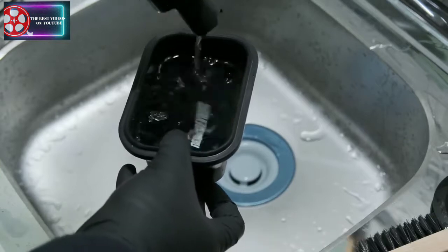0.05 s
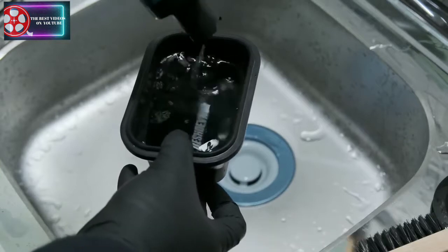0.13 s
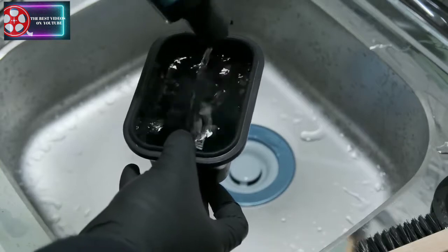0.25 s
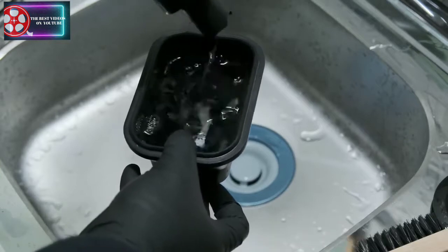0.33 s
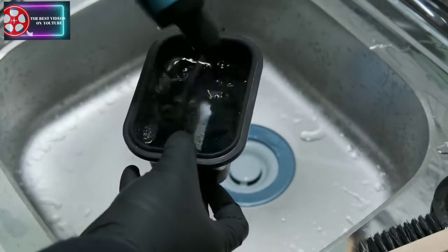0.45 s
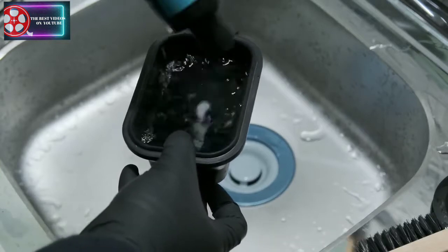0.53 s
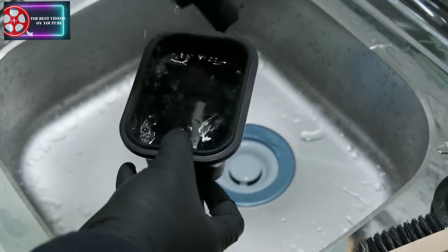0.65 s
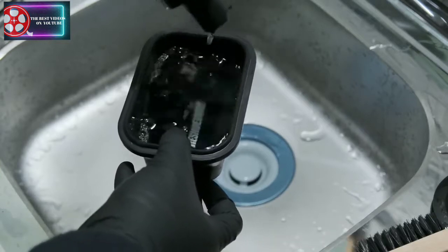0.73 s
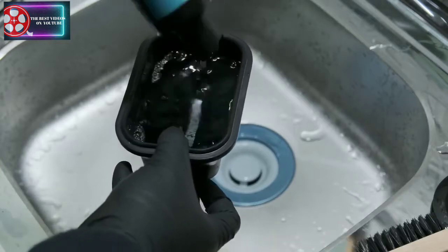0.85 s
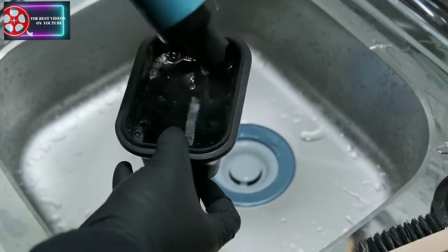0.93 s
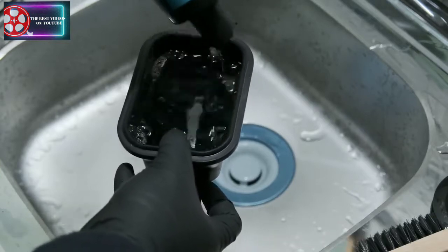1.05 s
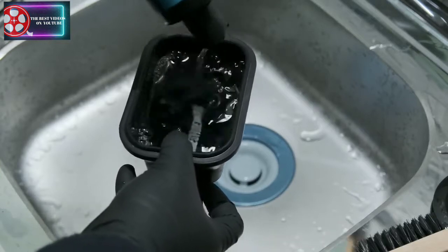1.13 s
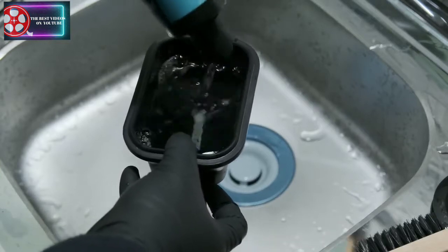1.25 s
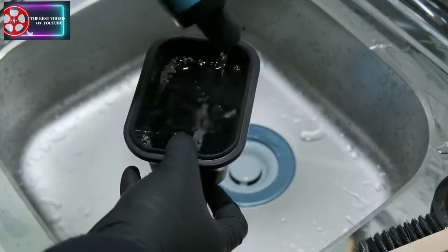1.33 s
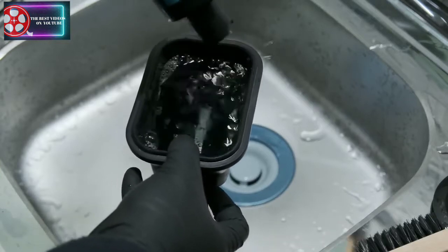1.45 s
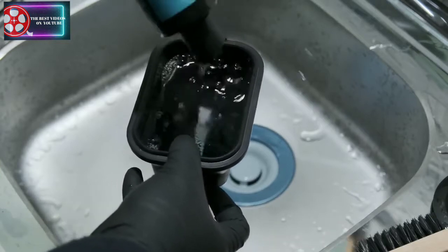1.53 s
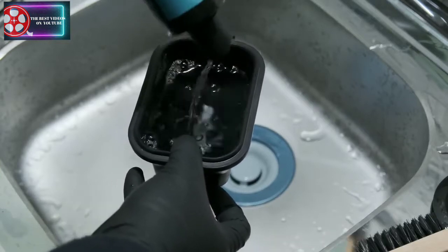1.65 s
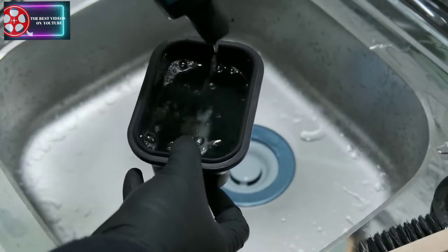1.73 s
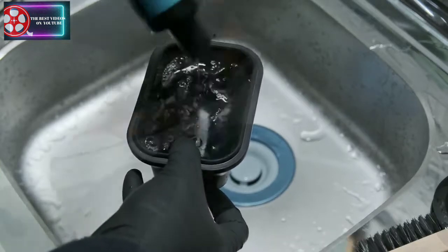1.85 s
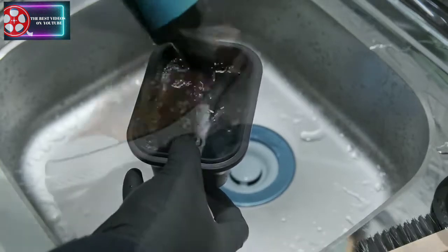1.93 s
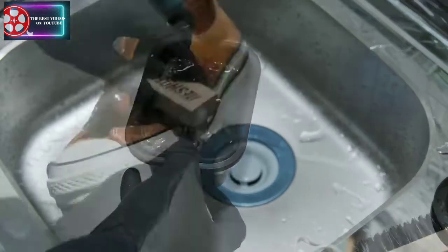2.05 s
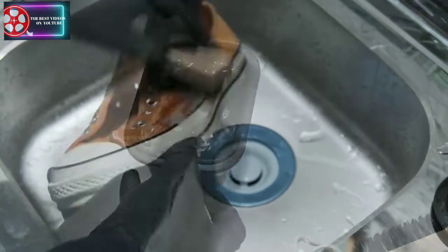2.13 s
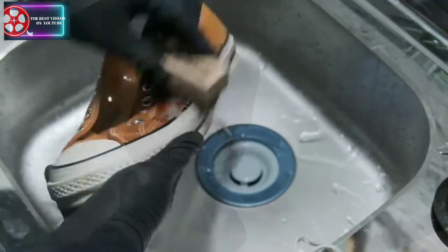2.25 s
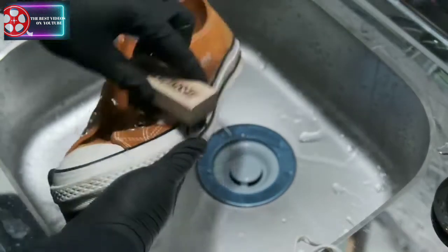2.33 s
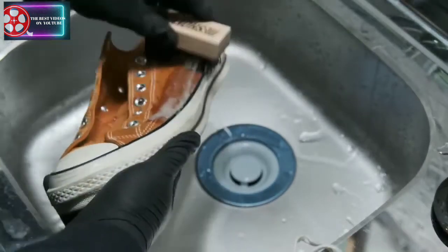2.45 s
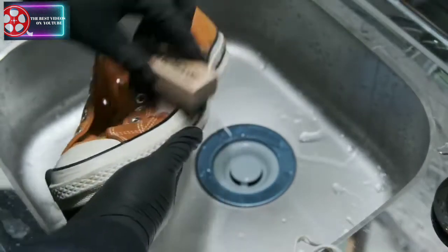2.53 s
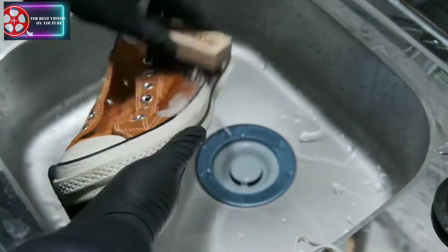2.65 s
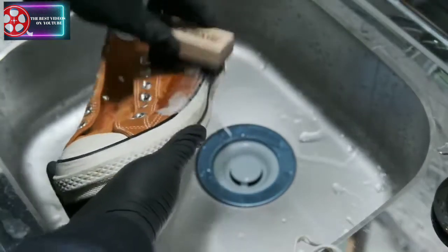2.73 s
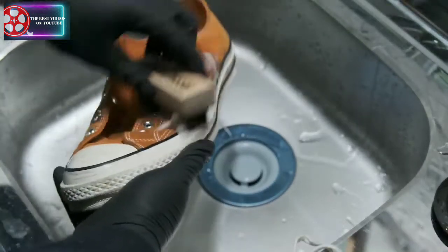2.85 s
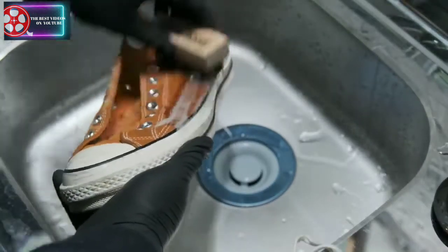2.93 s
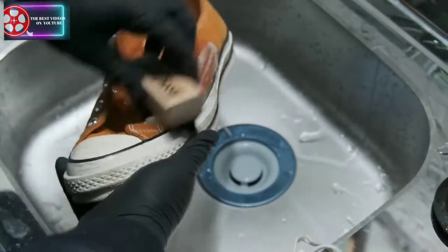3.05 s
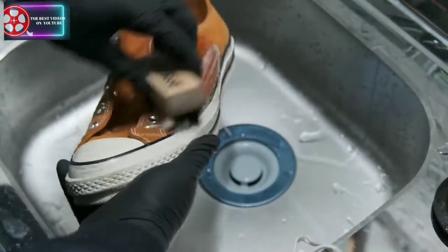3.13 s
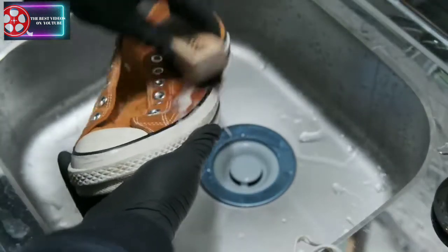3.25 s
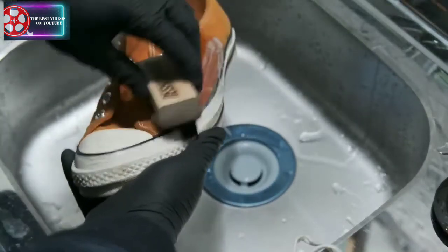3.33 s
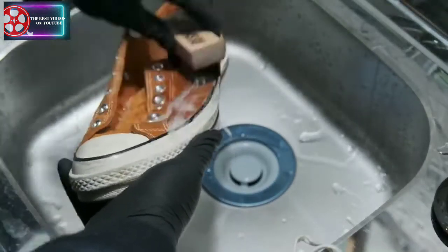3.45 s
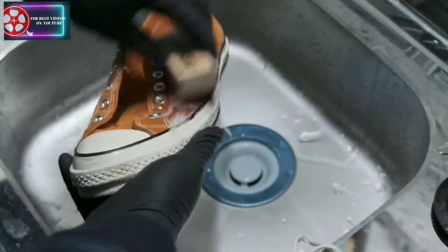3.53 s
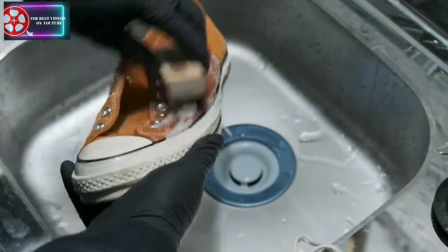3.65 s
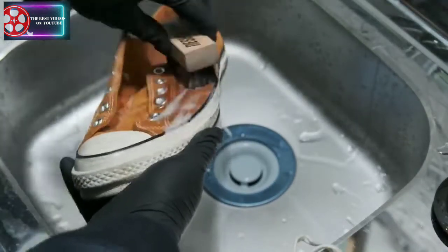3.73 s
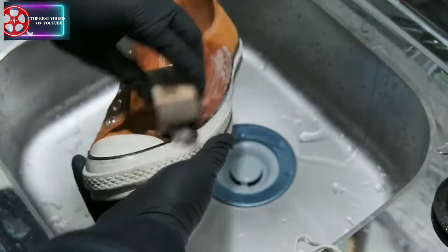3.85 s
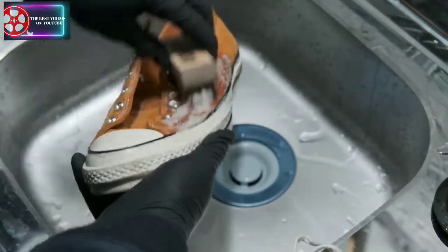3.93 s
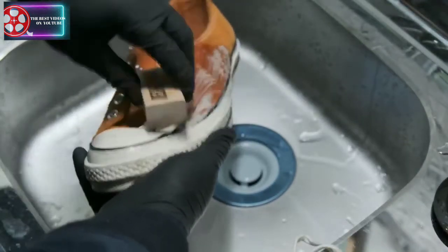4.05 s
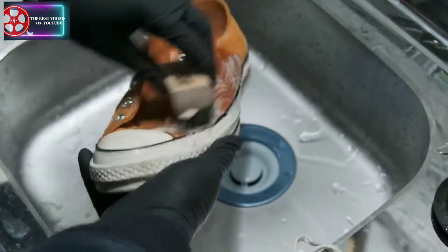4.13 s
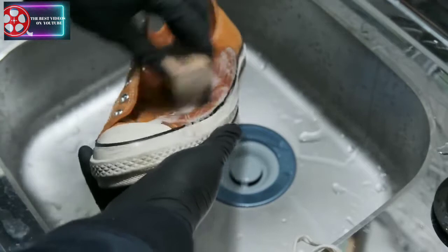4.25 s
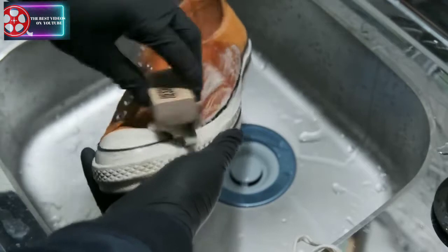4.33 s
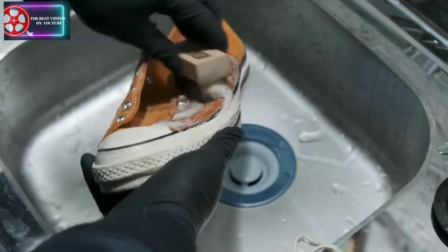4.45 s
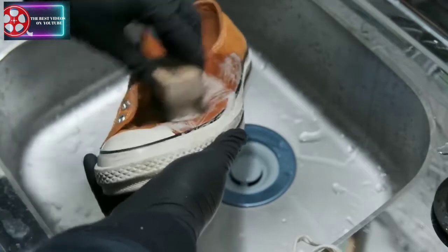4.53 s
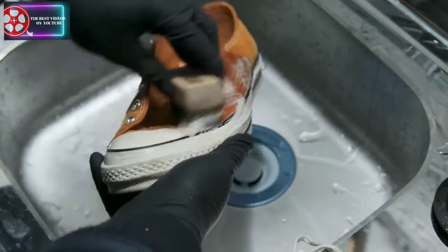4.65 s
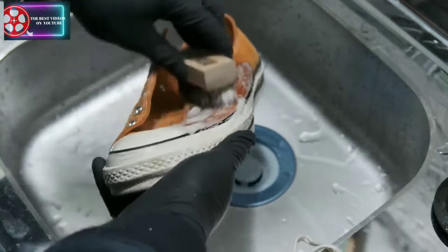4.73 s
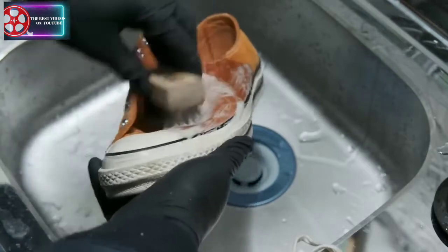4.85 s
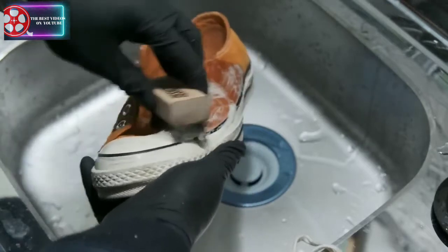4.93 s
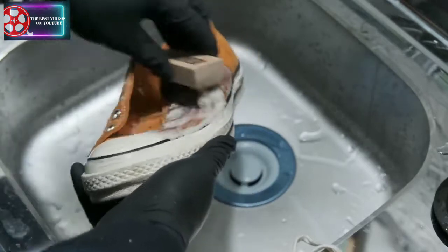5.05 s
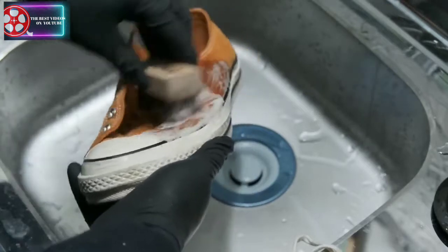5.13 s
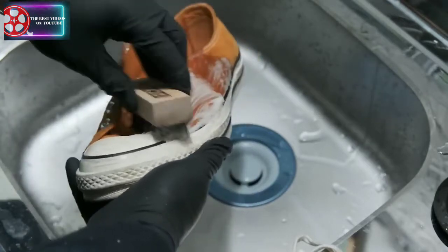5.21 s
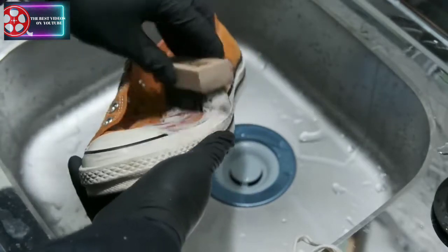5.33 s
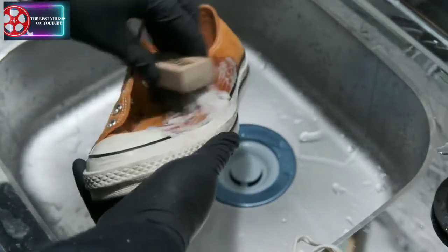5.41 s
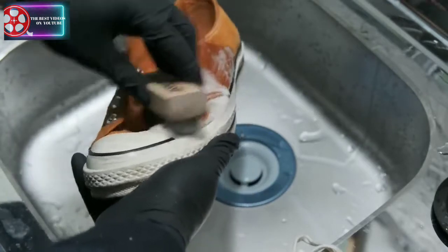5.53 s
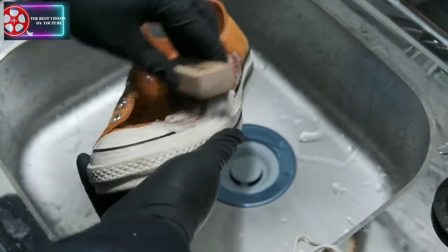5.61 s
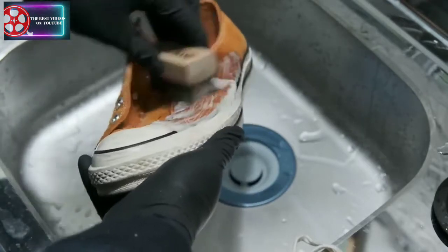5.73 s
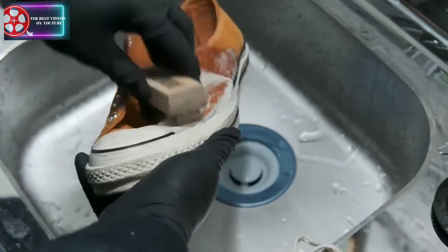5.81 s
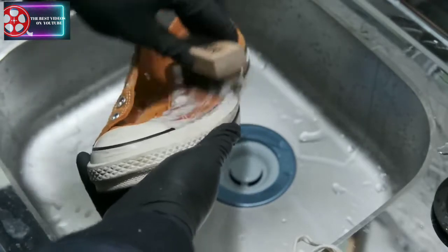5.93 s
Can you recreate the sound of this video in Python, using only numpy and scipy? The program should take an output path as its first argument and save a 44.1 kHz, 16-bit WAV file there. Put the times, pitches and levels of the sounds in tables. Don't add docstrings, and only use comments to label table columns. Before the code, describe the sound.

Water drips and bubbles ring in a small tub over a steel sink, then a stiff brush scrubs a wet shoe in quick rhythmic strokes.

```python
import sys
import numpy as np
from scipy import signal
from scipy.fft import rfft, irfft
from scipy.io import wavfile
from scipy.ndimage import uniform_filter1d

SR = 44100
rng = np.random.default_rng(int(sys.argv[2]) if len(sys.argv) > 2 else 0)


def master(y):
    cut = np.clip(np.atleast_2d(y).T, -1, 1)
    pcm = np.round(cut * 32767)
    wavfile.write(sys.argv[1], SR, pcm.astype(np.int16))


def invert_db(x):
    u = np.asarray(x, float) / 20
    return 10 ** u


N = 263718
T = np.arange(N) / SR
HZ = np.maximum(np.fft.rfftfreq(N, 1 / SR), 1.)

# f/Hz, density/dB
HISS_COLOUR = [(15, -38), (25, -18), (130, -13), (353, -7), (751, -6.5), (1190, -6.5), (1480, -8.5),
               (2210, -6), (3800, -9), (6880, -10.5), (10600, -12), (15900, -12)]
HISS_DB = -59.5
# multiple of the hum, level/dB
MOTOR = [(1, -94), (2, -88), (3, -85.5), (5, -82.5), (6, -85), (8, -86)]
MOTOR_HZ = 66

# t/s, level/dB, start f/Hz, end f/Hz, length/s, lateness of the rise
GURGLES = [
    (0.177, -38, 1306, 1485, 0.048, 1.86),
    (0.223, -48.5, 1440, 3020, 0.023, 2),
    (0.356, -39, 1428, 4630, .021, 2.27),
    (0.657, -60, 4300, 5600, 0.021, 1.5),
]
# t/s, length/s, level/dB, lowest f/Hz, highest f/Hz
FROTH = [(0., 0.04, -59.5, 730, 3300), (0.157, 0.026, -46, 3050, 6000), (0.222, 0.039, -51, 960, 6000),
         (0.376, 0.037, -47.5, 2030, 6170), (0.563, 0.082, -54, 790, 2300), (0.557, 0.035, -40, 3000, 5400),
         (0.601, 0.076, -55, 890, 5260), (0.882, 0.12, -68, 510, 1590), (1.097, 0.039, -57, 2970, 4460),
         (1.477, 0.097, -60, 500, 2330), (1.48, 0.061, -57, 3050, 5160), (1.607, 0.019, -57, 3100, 5030),
         (1.697, 0.096, -56, 2080, 5660), (1.741, 0.11, -64, 386, 2850), (1.747, .07, -62, 348, 700),
         (1.73, 0.056, -58, 5500, 10000), (1.911, 0.074, -53.5, 3080, 9850),
         (2.044, 0.036, -62.5, 473, 1830), (1.276, 0.021, -52, 3900, 5200), (1.287, .04, -56, 1900, 2600),
         (1.31, 0.022, -50, 5800, 8200), (1.426, .04, -55, 5200, 9000), (2.049, 0.012, -50, 3800, 4800),
         (.08, 0.042, -57, 5430, 7500)]
# t/s, peak level/dB, f/Hz
DROPLETS = [(0.575, -24, 1940), (0.585, -35, 1300), (0.597, -36, 2070), (0.61, -41, 1900),
            (0.624, -46, 1400), (1.299, -40, 2320), (1.32, -49, 1900), (1.515, -35, 1390),
            (1.526, -42, 1370), (1.537, -43, 1460), (1.564, -50, 1410), (1.703, -47, 3840),
            (1.714, -38, 4270), (1.741, -42, 1730), (1.757, -46, 1300), (1.775, -40, 1330),
            (1.837, -47, 1770), (1.884, -50, 5030), (1.937, -34, 4430), (1.954, -47, 4530)]
DROPLET_CYCLES = 3.9
# t/s, peak level/dB
SPRAY = [(0.2228, -37), (0.376, -35), (0.3925, -39), (0.417, -27), (0.557, -39), (0.5949, -34),
         (1.0679, -36), (1.1148, -46), (1.2495, -34), (1.276, -26.5), (1.3087, -24), (1.424, -24),
         (1.493, -30), (1.7614, -41), (1.798, -36), (1.8446, -36), (1.903, -36)]
# t/s, peak level/dB, f/Hz, ring t60/ms
BUBBLES = [(0.1, -43, 875, 32), (0.0983, -43, 1256, 34), (0.1788, -24, 1340, 8.6), (0.198, -31, 2500, 11),
           (0.225, -28, 3760, 10.7), (0.2243, -34, 2110, 21), (0.418, -33, 1290, 25),
           (0.418, -31.5, 2580, 18), (0.5567, -29, 1970, 22), (0.819, -43.5, 1130, 18),
           (0.8826, -44, 900, 20), (1.0126, -47, 3330, 24), (1.0914, -42.5, 2770, 19),
           (1.239, -36.5, 2140, 18), (0.377, -21, 4660, 8.2), (1.2772, -32, 4330, 11),
           (1.2888, -48, 2210, 29), (1.4703, -17.5, 1404, 24), (1.4939, -39, 3720, 9),
           (1.7305, -46, 4360, 24), (1.7412, -37, 7000, 8), (1.7504, -45.5, 570, 25),
           (1.791, -39.5, 1285, 22), (1.791, -45, 2510, 22), (1.8005, -33.5, 4450, 17),
           (1.8157, -35, 1740, 21), (1.8284, -32.5, 2240, 6.9), (1.9303, -37, 3240, 11),
           (1.9683, -42, 4770, 16), (2.0532, -34.5, 4260, 20)]
# t/s, peak level/dB, f/Hz
POPS = [(0.013, -44, 2560), (0.099, -43, 6600), (0.164, -23, 3320), (0.2066, -37, 3960), (0.5572, -32, 910),
        (1.2404, -40, 4530), (0.4181, -30, 9900), (0.5573, -22.5, 1230), (0.5582, -14, 3900),
        (0.5637, -23, 4730), (0.597, -35, 10800), (0.646, -41, 1290), (0.6782, -35, 7160),
        (1.07, -41, 11200), (1.2508, -39, 12130), (1.3105, -23, 6760), (1.4284, -24.5, 10900),
        (1.429, -19, 6860), (1.4708, -33, 2530), (1.4877, -31, 1720), (1.505, -34, 4190),
        (1.6097, -41, 4180), (1.6437, -41.5, 2270), (1.747, -30, 8500), (1.8463, -32.5, 11500),
        (1.9042, -25, 9500), (1.909, -34, 5000), (1.9306, -23.5, 4530), (1.945, -31.5, 9050),
        (2.0536, -42, 1340), (0.679, -44, 1470), (0.694, -53, 810), (2.0565, -41, 9000), (1.538, -43, 3800)]
POP_CYCLES, POP_LEAST_MS = 20.3, 3.9
# t/s, crack level/dB
IMPACTS = [(0.099, -35.5), (0.164, -42), (0.1794, -31.5), (0.225, -34), (0.378, -26), (0.3938, -40),
           (0.4181, -30), (0.5583, -25.5), (0.5653, -41), (0.595, -37), (0.646, -45), (0.678, -33.5),
           (1.07, -51), (1.276, -34), (1.3101, -38), (1.426, -36), (1.4556, -51), (1.4938, -33),
           (1.741, -39), (1.747, -45), (1.7566, -34), (1.8003, -33.5), (1.929, -32), (1.9687, -40)]

# grip t/s, let-go t/s, early level/dB, late level/dB
STROKES = [(2.183, 2.247, -28, -25.5), (2.305, 2.37, -26.5, -26.5), (2.443, 2.509, -28.5, -28.5),
           (2.557, 2.628, -27, -27.5), (2.7, 2.757, -25, -24.5), (2.813, 2.883, -29, -28.5),
           (2.952, 3.018, -26.5, -25.5), (3.076, 3.149, -25.5, -26), (3.22, 3.275, -26, -24.5),
           (3.333, 3.394, -28.5, -23.5), (3.473, 3.53, -26.5, -24.5), (3.594, 3.657, -27, -25),
           (3.725, 3.79, -24.5, -26.5), (3.84, 3.898, -27, -24), (3.973, 4.037, -26, -27),
           (4.083, 4.133, -27, -25), (4.206, 4.28, -27.5, -27.5), (4.326, 4.392, -32, -27),
           (4.458, 4.524, -22, -25), (4.582, 4.656, -31, -32.5), (4.741, 4.848, -24, -30.5),
           (4.922, 5.003, -41.5, -38.5), (5.043, 5.143, -28, -30), (5.181, 5.272, -35.5, -34.5),
           (5.318, 5.46, -29.5, -29.5), (5.467, 5.547, -34.5, -31), (5.641, 5.758, -26.5, -27.5),
           (5.797, 5.87, -33, -30), (5.945, 5.982, -26.5, -25.5)]
USUAL_DB = -27
# t/s, level/dB
TURNS = [(2.165, -48), (2.285, -41.5), (2.416, -47), (2.537, -43.5), (2.673, -46), (2.795, -45.5),
         (2.928, -51), (3.052, -45), (3.193, -48), (3.313, -45.5), (3.449, -47.5), (3.567, -43.5),
         (3.703, -48), (3.819, -46.5), (3.949, -44.5), (4.064, -47), (4.177, -39.5), (4.31, -44.5),
         (4.429, -37), (4.562, -41.5), (4.692, -44.5), (4.899, -46), (5.011, -43), (5.166, -41),
         (5.292, -40.5), (5.468, -32), (5.586, -41), (5.791, -36), (5.907, -40)]
# t/s, lather/0-1, over the hollow/0-1
TRAVEL = [
    (2.15, 0.03, 0.2),
    (2.6, 0.33, 0.18),
    (3.3, 0.1, 0.33),
    (4.0, 0.05, 0.72),
    (4.3, 0.32, 0.6),
    (4.9, 0.82, 0.98),
    (5.4, 1, 0.93),
    (5.98, 0.72, 0.76),
]
# f/Hz, density/dB
SUEDE = [(260, -65), (450, -21), (590, -16), (760, -16), (900, -11.5), (1480, -6), (2000, -4.5),
         (3300, -4.5), (5000, -5.5), (6800, -9), (9500, -10.5), (12000, -13), (14000, -16.5), (15900, -23)]
# f/Hz, width/Hz, boost/dB
SHOE_MODES = [(630, 70, 3), (1005, 40, 5.5), (1320, 70, 2.5), (1790, 35, 3), (1915, 50, 3), (2520, 40, 2.5),
              (830, 60, 2.5), (2140, 70, 2.5), (2660, 300, 5), (3760, 110, 2.5), (4500, 200, 2)]
BRISTLE_DB, BRISTLE_FOLLOW, BRISTLE_PULL_DB, BRISTLE_LATHER_DB = -32, 0.48, -1, -7
BRISTLE_TURN_DB, BRISTLE_TURN_FOLLOW = -54, 0.79
LATHER_MUFFLES = .42
HOLLOW_DB, HOLLOW_FOLLOW, HOLLOW_TOE_DB, HOLLOW_PULL_DB = -46, 0.42, 4.5, 1.5
HOLLOW_TURN_DB, HOLLOW_TURN_TOE_DB, HOLLOW_TURN_FOLLOW = -57.5, 6, 0.83
THUD_DB, THUD_TOE_DB, THUD_UNEVEN_DB = -80.5, 15.5, 2.5
PUSH_BITE_DB = 0.5
TOE_TILT_DB = 4
# t/s, level/dB
KNOCKS = [(2.27, -68), (2.53, -66), (3.16, -63), (3.82, -72), (3.93, -61), (4.14, -55), (4.38, -54.5),
          (4.66, -55), (5.25, -63), (5.37, -61), (5.52, -58.5), (5.63, -57)]
KNOCK_S = 0.021
# t/s, level/dB
FIZZ = [
    (4.365, -44),
    (4.429, -40.5),
    (4.899, -48),
    (5.011, -58),
    (5.292, -45),
]
FIZZ_S = 0.02
# t/s, level/dB
RINGS = [
    (2.6, -67),
    (3.1, -63),
    (3.5, -44),
    (3.85, -50),
    (4.02, -49),
    (4.27, -50),
    (4.6, -44),
    (5.18, -57),
    (5.76, -47),
    (5.83, -51),
]
RING_HZ, RING_S = 999, 0.029
# t/s, level/dB
BOOMS = [
    (4.12, -50),
    (4.4, -51),
    (4.7, -46),
    (4.95, -50.5),
    (5.3, -55),
    (5.58, -45),
    (5.9, -47.5),
]
BOOM_HZ, BOOM_S = 624, 0.051
# t/s, peak level/dB, f/Hz, t60/ms
RAPS = [
    (2.603, -19, 3200, 9),
    (4.433, -24, 9000, 5.4),
    (4.916, -22, 1770, 60),
    (4.935, -25, 1490, 80),
    (4.966, -23.5, 2480, 31),
    (5.021, -18.5, 6000, 9.2),
    (5.939, -11, 8000, 4.4),
]

# from/s, to/s
DROPOUT = (1.859, 1.8675)
# t/s, length/s
GAPS = [(1.283, .004), (1.303, .003), (1.417, .006), (1.8135, .007), (1.8365, .006), (1.907, .0055)]
SPLIT_S = [2.47, 2.775, 3.68, 4.06, 4.165, 4.57, 5.0, 5.045, 5.16, 5.6, 5.93]
# f/Hz, level/dB
STARVED = [(40, -53), (260, -50.5), (450, -47), (600, -56), (11000, -59), (12500, -48.5), (14300, -42),
           (16000, -40.5)]
STARVE_FOLLOW = .25
FRAME_LEAD = 575
# from/s, to/s, up to f/Hz
BASS_HOLES = [(2.185, 2.245, 500), (2.42, 2.5, 470), (2.535, 2.64, 210), (2.56, 2.615, 470),
              (2.72, 2.78, 500), (2.78, 2.81, 120), (2.835, 2.85, 400), (2.95, 3.01, 470),
              (3.045, 3.105, 400), (3.19, 3.335, 210), (3.23, 3.29, 400), (3.465, 3.66, 450),
              (3.72, 3.8, 430), (3.835, 4.03, 230), (3.855, 3.875, 430), (3.995, 4.03, 450),
              (4.3, 4.335, 260), (4.58, 4.615, 210), (4.7, 4.78, 120), (4.76, 4.78, 470)]
# from/s, to/s
NOTCHES = [(2.3, 2.36), (3.34, 3.4), (3.78, 4.0), (4.08, 4.11), (4.45, 4.52), (5.69, 5.72)]
NOTCH_LO_HZ, NOTCH_HI_HZ = 335, 465


def gain_of_points(points):
    hz, db = np.transpose(points)
    return invert_db(np.interp(np.log(HZ), np.log(hz), db))


def above(hz, steep):
    return 1 / (1 + (hz / HZ) ** steep)


def filtered(x, gain):
    return irfft(rfft(x) * gain, N)


def shaped(x, gain, lo_hz=20, hi_hz=16000):
    z = rfft(x) * gain
    inside = (HZ > lo_hz) & (HZ < hi_hz)
    return irfft(z, N) * N / np.sqrt(2 * np.sum(np.abs(z[inside]) ** 2))


def walk(rate):
    k = int(SR / rate)
    held = np.repeat(rng.standard_normal(N // k + 1), k)
    return 1.38 * uniform_filter1d(uniform_filter1d(held, k), k)[:N]


def add(out, s, sound):
    i = int(s * SR)
    out[i:i + len(sound)] += sound


def bumps(events, width_s):
    return sum(invert_db(db) * np.exp(-((T - s) / width_s) ** 2) for s, db in events)


def eased(s, values):
    place = np.interp(T, np.sort(s), np.arange(len(s)))
    k = np.minimum(place.astype(int), len(s) - 2)
    u = place - k
    ramp = u * u * (3 - 2 * u)
    return uniform_filter1d(values[k] + (values[k + 1] - values[k]) * ramp, size=130)


def floor(side_db=-2.0):
    colour = gain_of_points(HISS_COLOUR)
    mid = shaped(rng.standard_normal(N), colour)
    side_tilt = 1 + 7.6 * above(8300, 0.89) + 0.48 * (1 - above(470, 2))
    side = shaped(rng.standard_normal(N), colour * side_tilt)
    hum = sum(invert_db(db) * np.sqrt(2) * np.sin(k * (2 * np.pi * MOTOR_HZ * T + k)) for k, db in MOTOR)
    return hum + invert_db(HISS_DB) * (mid + invert_db(side_db) * side * np.array([[1], [-1]]))


def basin(x, t60, wet_db, treble_t60):
    t = np.arange(int(.3 * SR)) / SR
    noise = rng.standard_normal((2, len(t)))
    dull = signal.lfilter([.4], [1, -.6], noise[0]) * invert_db(-60 * t / t60)
    bright = 0.32 * noise[1] * invert_db(-60 * t / treble_t60)
    tail = (dull + bright) * (t > .002)
    return x + invert_db(wet_db) * signal.fftconvolve(x, tail / np.sqrt(np.sum(tail ** 2)))[:N]


def froth(per_s, cycles):
    out, t = np.zeros(N), np.arange(1500) / SR
    for s, length, db, lo_hz, hi_hz in FROTH:
        chance = rng.random((120, 3))[:int(per_s * length)]
        for when, size, power in chance:
            hz = lo_hz * (hi_hz / lo_hz) ** size
            fade = np.minimum(t * hz, 1) * np.exp(-t * hz / cycles)
            ring = fade * np.sin(2 * np.pi * hz * t * (1 + 0.0059 * hz * t))
            add(out, s + when * length, invert_db(db - 7 * when + 10 * power) * ring)
    return out


def gurgles():
    out = np.zeros(N)
    for s, db, hz0, hz1, length, late in GURGLES:
        u = np.arange(int(length * SR)) / (length * SR)
        swell = np.sin(np.pi * u) ** .3 * invert_db(3.2 * walk(300)[:len(u)] - 130 * length * u)
        hz = hz0 * (hz1 / hz0) ** (u ** late)
        add(out, s, invert_db(db) * swell * np.sin(2 * np.pi * np.cumsum(hz) / SR))
    return out


def droplets_and_spray():
    out, t = np.zeros(N), np.arange(3000) / SR
    for s, db, hz in DROPLETS:
        fade = np.minimum(t * hz, 1) * np.exp(-t * hz / DROPLET_CYCLES)
        add(out, s, invert_db(db - 4.5) * fade * np.sin(2 * np.pi * hz * t))
    treble = signal.butter(4, 8500, "high", fs=SR, output="sos")
    tick = signal.sosfilt(treble, 1. * (t[:60] == 0))
    for s, db in SPRAY:
        add(out, s + .0012, invert_db(db + 2.5) * tick / tick.max())
    return out


def drips(rise=0.006, ring=0.82, ring_db=4.0, tick_ms=0.93, wobble_db=3.5):
    out, t = np.zeros(N), np.arange(3000) / SR
    for s, db, hz, ms in BUBBLES + [(*pop, POP_LEAST_MS) for pop in POPS]:
        t60 = max(ms, 1000 * POP_CYCLES / hz) * ring / 1000
        fade = np.exp(-np.log(1000) * t / t60)
        phase = 2 * np.pi * np.cumsum(hz * (1 + rise * (.5 - fade))) / SR
        wobble = wobble_db * np.repeat(rng.standard_normal(30), 100) * (t > .002)
        onset = np.minimum(t * hz / 1.63, 1)
        add(out, s, invert_db(db + ring_db + wobble) * fade * np.sin(phase) * onset)
    for s, db in IMPACTS:
        crack = signal.lfilter(*signal.iirpeak(6000, .55, fs=SR), rng.standard_normal(200))
        add(out, s, invert_db(db) * crack * np.exp(-t[:200] * 1000 / tick_ms))
    return out


def raps():
    out, t = np.zeros(N), np.arange(1700) / SR
    for s, db, hz, ms in RAPS:
        crack = signal.lfilter(*signal.iirpeak(hz, .7, fs=SR), rng.standard_normal(len(t)))
        add(out, s, invert_db(db - 60000 * t / ms) * crack / crack.std() / 2)
    return out


def thud_level():
    when, _, toe = np.transpose(TRAVEL)
    rumble = invert_db(THUD_DB + THUD_TOE_DB * np.interp(T, when, toe) + THUD_UNEVEN_DB * walk(7))
    return rumble + bumps(KNOCKS, KNOCK_S)


def stroke_levels(edge_db=-4, crown_db=0.5, lead=0.16, bite_s=.008, drag=.33):
    grip, free, early, late = np.transpose(STROKES)
    turn, turn_db = np.transpose(TURNS)
    when, lather, toe = np.transpose(TRAVEL)
    lather, toe = np.interp(grip, when, lather), np.interp(grip, when, toe)
    pull = np.arange(len(grip)) % 2
    middle = (early + late) / 2
    strength = middle - USUAL_DB
    span = lead * (free - grip)
    bite = grip - np.minimum(bite_s, 0.27 * (grip - turn))
    s = np.ravel([turn, bite, grip, grip + span, free - span, free], "F")
    grip_db = early + edge_db + PUSH_BITE_DB * (1 - 2 * pull)
    shape = np.array([grip_db, early + crown_db, late + crown_db, late + edge_db]) - middle
    turn_change = turn_db - turn_db[0]

    rasp = USUAL_DB + strength + shape
    hiss = BRISTLE_DB + BRISTLE_FOLLOW * strength + BRISTLE_PULL_DB * pull + BRISTLE_LATHER_DB * lather
    hiss_turn = BRISTLE_TURN_DB - 3.3 * lather + BRISTLE_TURN_FOLLOW * turn_change
    hollow = HOLLOW_DB + HOLLOW_FOLLOW * strength + (HOLLOW_TOE_DB + HOLLOW_PULL_DB * pull) * toe
    hollow_turn = HOLLOW_TURN_DB + HOLLOW_TURN_TOE_DB * toe + HOLLOW_TURN_FOLLOW * turn_change
    hollow_shape = shape + [[3.5], [0], [0], [5.5]]

    share = np.clip(drag + 0.54 * toe, 0, 1)
    levels = []
    for at_turn, stroke in [(turn_db, rasp), (hiss_turn, hiss + shape), (hollow_turn, hollow + hollow_shape)]:
        at_bite = at_turn + share * (stroke[0] - at_turn)
        levels.append(eased(s, np.ravel([at_turn, at_bite, *stroke], "F")))
    return levels


def flicks(per_s, spread_db, share):
    strength = invert_db(spread_db * np.minimum(rng.exponential(size=N), 2))
    let_go = (rng.random(N) < per_s / SR) * rng.standard_normal(N) * strength
    return share * let_go / let_go.std() + rng.standard_normal(N)


def suede_rasp(rub, toe):
    rasp, rubbed = 0, rfft(rub)
    edges_hz = [20, 1800, 2300, 2900, 3600, 4500, 20000]
    for lo_hz, hi_hz in zip(edges_hz[:-1], edges_hz[1:]):
        tilt_db = TOE_TILT_DB * (toe - .5) * np.log2(3200 / min(hi_hz, 5000))
        tuft = irfft(rubbed * (above(lo_hz, 16) - above(hi_hz, 16)), N)
        rasp = rasp + invert_db(tilt_db + 1.9 * walk(60) + 1.2 * walk(18)) * tuft
    return rasp


def brush():
    rasp_db, hiss_db, hollow_db = stroke_levels()
    when, lather, toe = np.transpose(TRAVEL)
    lather, toe = np.interp(T, when, lather), np.interp(T, when, toe)
    body = gain_of_points(SUEDE)
    for hz, width_hz, db in SHOE_MODES:
        body = body * invert_db(db / (1 + (2 * (HZ - hz) / width_hz) ** 2))
    low, high = above(1400, 6), above(6000, 8)
    patch = walk(70)
    rub = flicks(9000, 1.2, .45)

    rasp = shaped(suede_rasp(rub, toe), body * low * (1 - high), 1460, 6000)
    hiss = shaped(rub + 0.52 * flicks(6000, 4.7, 0.23), body * high, 6660, 16700)
    hiss = hiss - LATHER_MUFFLES * lather * filtered(hiss, above(13000, 12))
    hollow = shaped(flicks(1500, 3.4, 0.89), body * (1 - low), 450, 2700)
    deep = filtered(hollow, 1 - above(760, 12))
    ring = shaped(hollow, 1 / (1 + ((HZ - RING_HZ) / 22) ** 2))
    boom = shaped(hollow, 1 / (1 + ((HZ - BOOM_HZ) / 45) ** 2))
    thud = shaped(rng.standard_normal(N), above(245, 5) * (1 - above(470, 6)), 150, 450)

    out = invert_db(rasp_db + 0.24 * patch) * rasp
    out += (invert_db(hiss_db + 0.56 * patch + 0.84 * walk(96)) + bumps(FIZZ, FIZZ_S)) * hiss
    out += invert_db(hollow_db) * (invert_db(1.8 * walk(45)) * (hollow - deep) + invert_db(2.1 * walk(25)) * deep)
    out += thud_level() * thud + bumps(RINGS, RING_S) * ring + bumps(BOOMS, BOOM_S) * boom
    return out * (T > 2.147)


def scene():
    water = drips() + droplets_and_spray() + gurgles() + froth(per_s=700, cycles=5)
    water = signal.sosfilt(signal.butter(3, 460, "high", fs=SR, output="sos"), water)
    water = basin(water, t60=0.021, wet_db=-5.0, treble_t60=0.12)
    shoe = basin(brush() + raps(), t60=.08, wet_db=-17, treble_t60=.05)
    return water + shoe + floor()


def lose_moments(x):
    start, end = DROPOUT
    x = x * uniform_filter1d(1. * ((T < start) | (T > end)), size=100)
    cut = uniform_filter1d(1. * sum((T > s) & (T < s + length) for s, length in GAPS), 30)
    return x - cut * filtered(x, above(1800, 4) - above(4400, 30) + above(5700, 30))


def narrow_and_grit(x):
    split = sum(np.clip(2 - np.abs(T - s) / 0.007, 0, 1) for s in SPLIT_S)
    narrowing = 0.92 - .5 * above(6700, 9.1) - 0.59 * (1 - above(400, 3))
    apart = filtered(x - x[::-1], narrowing) / 2
    x = x - apart * (T > TURNS[0][0]) * (1 - split)
    smeared = signal.fftconvolve(x[0], rng.standard_normal(256) / 16)[:N]
    grit = signal.lfilter([1, -.45], [1], smeared)
    return x + invert_db(-10.5) * split * grit * np.array([[1], [-1]])


def starve(x, scatter_db=4.2):
    frames = dict(fs=SR, window="cosine", nperseg=2048, noverlap=1024)
    hz, s, z = signal.stft(np.pad(x, [(0, 0), (FRAME_LEAD, 0)]), **frames)
    s = s - FRAME_LEAD / SR
    edges = np.r_[0, 12:32:4, 32:1025:10]
    width = np.diff(np.append(edges, 1025))[:, None]
    power = np.add.reduceat(np.abs(z.mean(axis=0)) ** 2, edges) / width
    limit_db = np.interp(hz[edges], *np.transpose(STARVED))[:, None]
    limit_db = limit_db + scatter_db * rng.standard_normal(power.shape)
    frame = np.sum(np.abs(z[0]) ** 2, axis=0) * (s > TURNS[0][0])
    frame = frame * (frame / invert_db(2 * USUAL_DB)) ** STARVE_FOLLOW
    fed = (power > frame * invert_db(2 * limit_db)) & (hz[edges] < 15800)[:, None]
    fed[hz[edges] < 330] = True
    fed = fed[np.searchsorted(edges, np.arange(len(hz)), "right") - 1]
    for first, last, top_hz in BASS_HOLES:
        fed[np.ix_(hz < top_hz, (s > first) & (s < last))] = False
    for first, last in NOTCHES:
        fed[np.ix_((hz > NOTCH_LO_HZ) & (hz < NOTCH_HI_HZ), (s > first) & (s < last))] = False
    return signal.istft(z * fed, **frames)[1][:, FRAME_LEAD:FRAME_LEAD + N]


def roll_off(x):
    return signal.sosfilt(signal.butter(12, 16030, fs=SR, output="sos"), x)


def record(dry):
    x = lose_moments(dry)
    x = narrow_and_grit(x)
    x = starve(x)
    return roll_off(x)


dry = scene()
out = record(dry)
master(out)
```